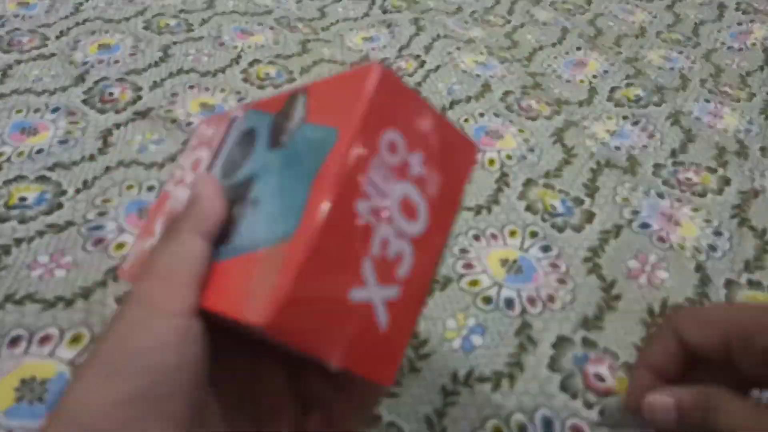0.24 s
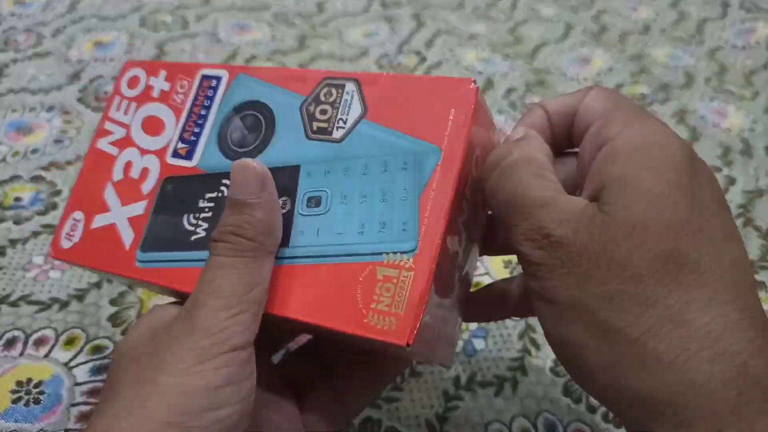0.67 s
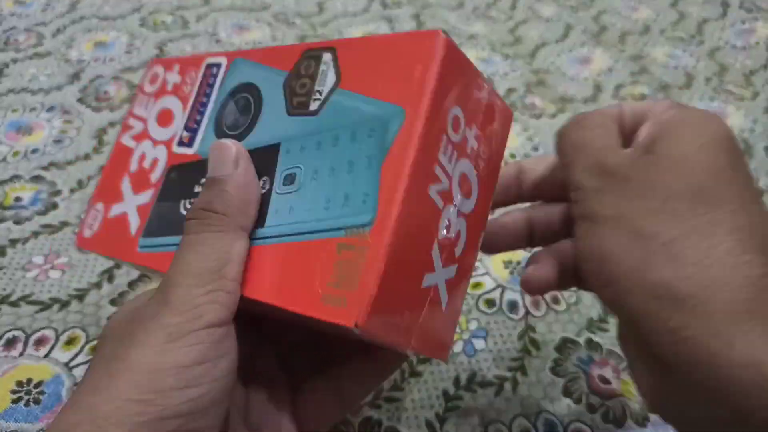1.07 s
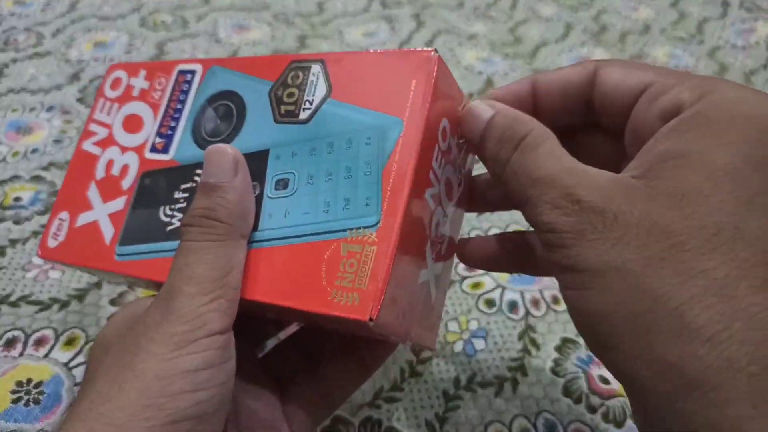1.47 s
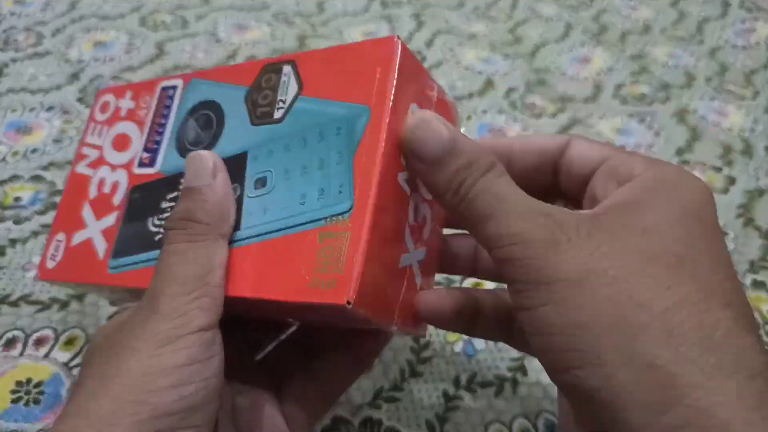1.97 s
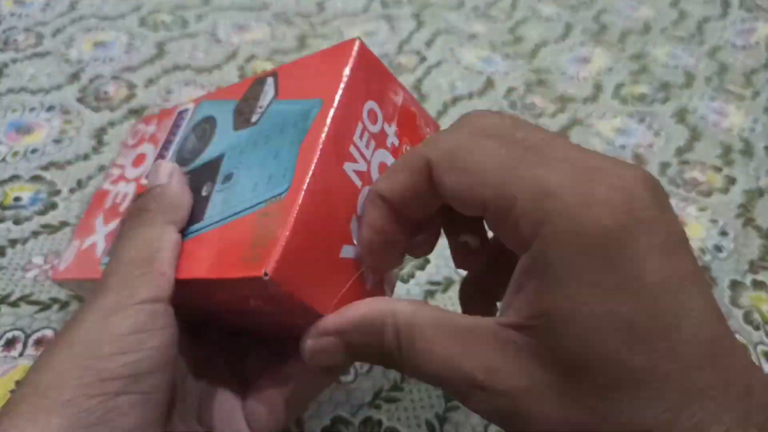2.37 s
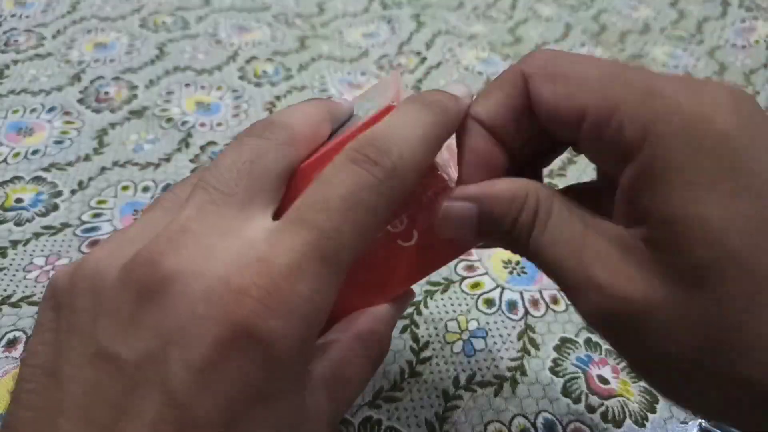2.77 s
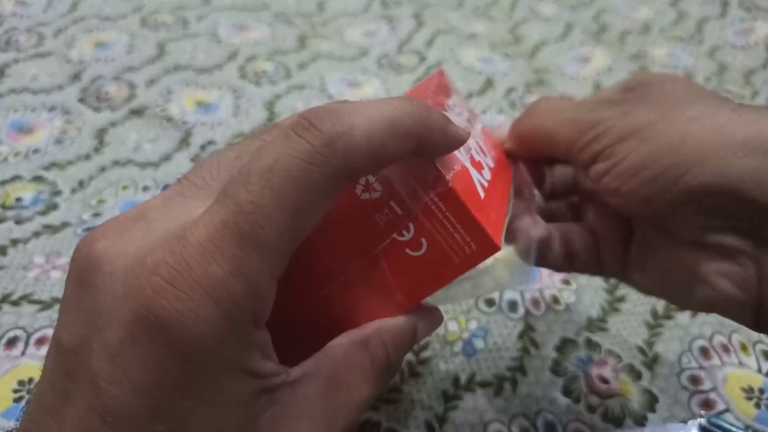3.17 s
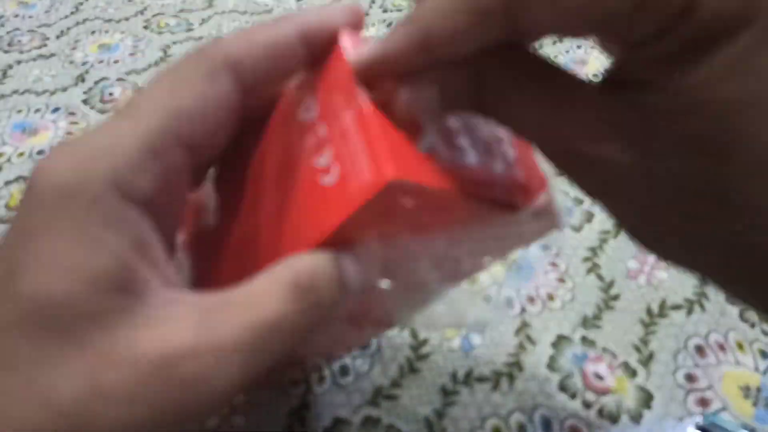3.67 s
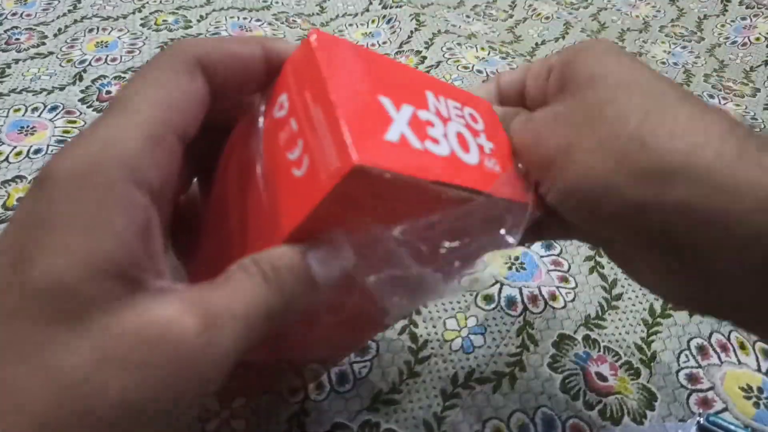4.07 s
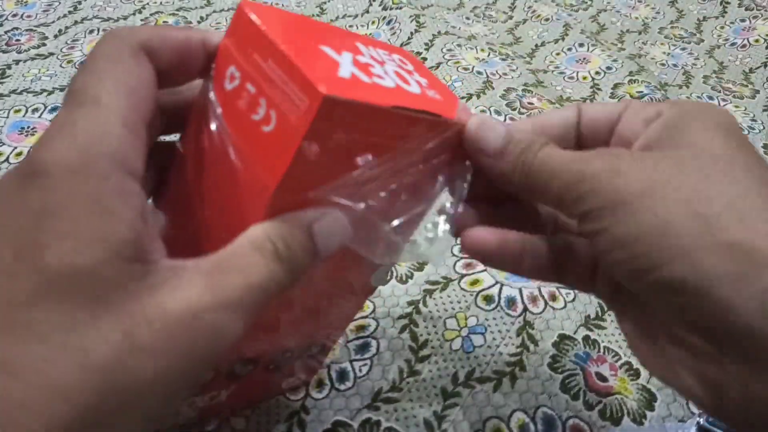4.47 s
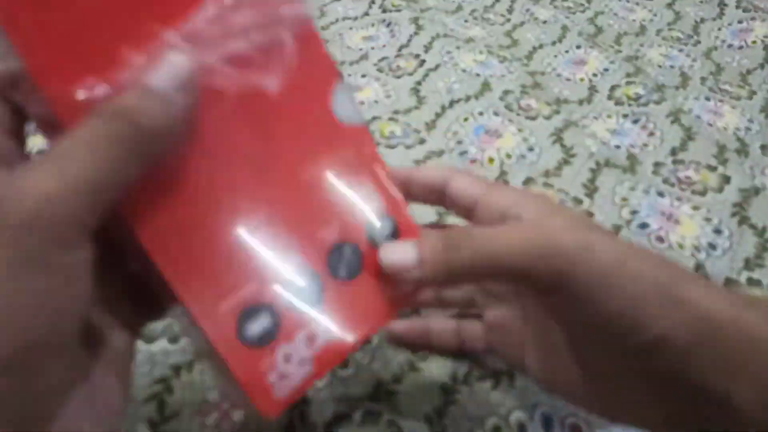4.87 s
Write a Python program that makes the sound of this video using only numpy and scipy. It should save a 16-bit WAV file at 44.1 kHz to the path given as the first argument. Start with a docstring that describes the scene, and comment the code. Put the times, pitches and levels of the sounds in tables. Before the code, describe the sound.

Fingers pick and peel thin plastic wrap from a small cardboard box, very close to a phone microphone. A few sharp snaps come early, then sparse ticks, then busy crackling with loud snaps and hollow thuds through the middle, brief film slides, lighter crinkling, and a final crisp burst. Small furnished room with short echoes, faint low traffic and hiss.

```python
"""Peeling film off a small box

Fingers pick at, tear and peel thin plastic film around a cardboard box held close to a phone.
Creases snap as gritty bursts that ring box, card and film; tiny puffs of noise crackle in between.
The film slides with a banded hiss, the hollow box gives low thuds, and skin brushes as filtered noise.
A furnished room answers with short echoes, over filtered noise for far traffic, palms and a faint hiss."""
import sys
import numpy as np
from scipy import signal
from scipy.fft import rfft, irfft
from scipy.io import wavfile
from scipy.ndimage import uniform_filter1d

SR = 44100
rng = np.random.default_rng(int(sys.argv[2]) if len(sys.argv) > 2 else 0)


def unload_audio(sound):
    """Save the sound as a 16-bit wav file, at the path given as the first command line argument."""
    columns = np.transpose(np.atleast_2d(sound))
    # keep every value between -1 and 1, then stretch to whole-number steps
    steps = np.round(np.clip(columns, -1, 1) * 32767)
    wavfile.write(sys.argv[1], SR, steps.astype(np.int16))


N = 225792  # length of the scene in samples

# Creases snapping; levels are before the trim of each part:
# start_s [s], knock_db, crack_db, ring_db, sizzle_db [dB], knock_pitch_hz [Hz], length_ms [ms]
CREASE_SNAPS = [(.1062, -58, -50.5, -46, -61, 1060, 5.6), (.1235, -60, -48, -43, -54, 980, 7.2),
                (.1308, -53, -51, -62, -69, 990, 2.7), (.1412, -37, -23.5, -23.5, -30, 1240, 2),
                (.1513, -34, -23.5, -15.5, -55, 1450, 1.4), (.1626, -49.5, -34.5, -32.5, -63, 870, 13),
                (.2772, -54, -62, -73, -77, 1080, 3.8), (.316, -62, -63, -61, -74, 1500, 1.2),
                (.3972, -43, -41.5, -47, -64, 800, 0.23), (.423, -55.5, -53, -49, -54, 1200, 1.1),
                (.467, -72, -67, -62, -70, 1000, 1.2), (.4937, -71, -67, -58, -72, 910, 1.6),
                (.5096, -74, -67, -53, -72, 940, 1.9), (.525, -64, -58, -47.5, -57, 950, 0.49),
                (.544, -48, -52.5, -53, -67, 985, 1.1), (.677, -66, -59, -55.5, -64, 1100, 6.4),
                (.7124, -28.5, -17.5, -19, -53, 1850, 1.12), (.813, -49.5, -49, -53.5, -72.5, 1230, 0.81),
                (1.0273, -45.5, -38.5, -35, -57, 860, 0.8), (1.0605, -54, -48.5, -44.5, -52.5, 1170, 9.2),
                (1.0734, -62.5, -46, -49.5, -60, 1300, 17), (1.603, -55.5, -63, -59.5, -79.5, 1405, 1.1),
                (1.7395, -54, -61, -47, -37.5, 1400, 2.9), (1.8297, -63, -44.5, -40, -55, 1210, 0.67),
                (1.8364, -64, -66, -47, -59, 930, 0.89), (1.8528, -66, -51.5, -53, -58, 930, 2.1),
                (1.9003, -46, -42, -41.5, -55, 880, 1.2), (1.907, -54.5, -49, -43, -56.5, 1720, 20),
                (1.925, -47.5, -45, -49, -63, 900, 0.45), (1.9407, -57, -64, -59, -78, 1300, 1.6),
                (1.9954, -48, -47.5, -51.5, -57, 990, 3.7), (2.0669, -39, -37.5, -51, -64, 1710, .89),
                (2.08, -56, -68, -68, -78, 900, 1.8), (2.0939, -54, -72, -67, -77, 1500, .54),
                (2.1063, -58, -55.5, -57, -70, 1670, 2.7), (2.125, -66, -54, -56, -71, 860, 2.2),
                (2.137, -60, -48, -59, -64, 1020, 0.93), (2.1425, -58, -57, -49, -50, 1020, 5.5),
                (2.1484, -30, -22, -23.5, -30, 1340, 1), (2.157, -54, -59, -66, -46, 1040, 2.4),
                (2.1865, -52, -68, -67, -71, 1200, 2.1), (2.2078, -42.5, -49, -48.5, -66, 1060, 0.3),
                (2.2546, -57, -65, -49.5, -63, 1050, 0.48), (2.2925, -46, -60, -66, -80, 1190, 1.6),
                (2.3413, -55.5, -55, -49, -54, 1130, 3), (2.4148, -34, -34, -12, -30, 1610, 1.2),
                (2.4192, -50.5, -44, -36, -55, 1000, .8), (2.4247, -18, -20, -18, -60, 905, 1.16),
                (2.4347, -39, -33, -42, -49, 965, 10.5), (2.4572, -45, -71, -50, -72, 860, 11),
                (2.4818, -40, -45.5, -49, -59, 1190, 3.4), (2.512, -60, -46, -42, -63, 900, 1),
                (2.519, -34.5, -48, -27, -38, 884, 1.36), (2.5828, -43, -41, -42, -50, 1050, 1.26),
                (2.649, -62, -53.5, -51, -61, 1170, 2), (2.7149, -51.5, -38, -69, -49.5, 1230, .57),
                (2.768, -61, -53, -51, -72, 1590, 1.4), (2.7801, -36, -24.5, -33, -34, 970, 0.65),
                (2.785, -55, -58, -58, -61, 1050, 2.4), (2.8075, -57, -48, -32, -33, 955, 0.56),
                (2.8161, -41, -25.5, -25.5, -36.5, 1860, 3.1), (2.8334, -40, -39.5, -40, -48, 900, 7.5),
                (2.8558, -51, -70, -49, -61, 940, 3.1), (2.905, -53.5, -45, -45.5, -57, 990, 5.1),
                (2.931, -47.5, -48, -56, -69, 1060, 1.9), (2.9496, -42, -61, -47.5, -67, 1110, 1.5),
                (2.9571, -53, -59, -64, -72, 1150, 1.1), (2.9826, -56, -50, -49.5, -68, 1150, 1.5),
                (3.001, -71, -60, -56, -70, 1370, 1.8), (3.015, -44.5, -66, -52, -72, 1180, 2.8),
                (3.0327, -63, -68, -53, -67, 940, .95), (3.0503, -44, -38.5, -45, -49, 1190, 1.1),
                (3.0624, -70, -51, -47, -50, 950, 0.54), (3.092, -54, -48.5, -56, -65, 1160, 1.8),
                (3.115, -73, -49.5, -47, -51, 940, 6.4), (3.1266, -52, -44.5, -43.5, -53, 830, 1.6),
                (3.133, -56, -47, -42.5, -50, 840, 0.91), (3.1858, -56, -50.5, -49, -59, 1300, 1.1),
                (3.2138, -55, -46.5, -61, -54, 1050, 0.8), (3.219, -49.5, -49, -49, -60, 890, 3.1),
                (3.2688, -86, -55, -48.5, -55, 970, 2.3), (3.3207, -74, -48.5, -51, -69, 1470, 0.29),
                (3.3873, -38.5, -42.5, -47, -55, 1200, 2), (3.426, -46, -49, -69, -73, 1630, 0.57),
                (3.4301, -47, -38, -37.5, -52.5, 1150, 1.4), (3.4784, -48, -43, -41, -58, 1500, 1.05),
                (3.505, -57, -53, -53, -58, 1160, 7.1), (3.5332, -52, -37, -38.5, -51, 760, 0.53),
                (3.5401, -42.5, -38, -40, -46.5, 1280, 5.9), (3.5647, -41, -50.5, -54, -71, 870, 4.5),
                (3.6, -53, -40, -41.5, -57, 1430, 2.3), (3.638, -53.5, -55.5, -53, -56, 930, 1.8),
                (3.7427, -54.5, -50.5, -40.5, -41.5, 1110, 4.3), (3.795, -50, -41, -35, -73, 845, 0.24),
                (3.8033, -50, -56, -43, -48, 1120, 1.1), (3.81, -47.5, -50, -51, -54, 1020, 2.1),
                (3.8401, -44.5, -33, -69, -53, 1470, 1.9), (3.8511, -40, -34.5, -37, -46, 900, 3.2),
                (3.9332, -51, -54, -66, -72, 934, 6.2), (3.943, -58, -47, -58, -76, 1000, 1.4),
                (3.9874, -57, -52, -47.5, -59, 1360, 1.3), (4.0081, -67, -44, -52, -55, 1540, 0.55),
                (4.0123, -46, -46, -52, -61, 1360, 1.7), (4.021, -75, -48.5, -50, -61, 1590, 19),
                (4.0575, -82, -45, -42.5, -46, 1520, 10), (4.0827, -39, -47, -46, -68, 2040, 1.6),
                (4.1155, -55, -42, -35, -79, 1450, 0.42), (4.12, -49.5, -47.5, -46, -62, 1200, 3.8),
                (4.1581, -41, -50, -51, -60, 1830, 2.2), (4.1708, -50, -60, -62, -67, 1450, 3.9),
                (4.212, -54.5, -64, -63, -72, 1240, 1.6), (4.229, -53, -52, -68, -73, 1030, 3.2),
                (4.2407, -57, -54, -49.5, -69, 1070, 3.3), (4.2675, -49.5, -44.5, -59, -67, 1340, 2.3),
                (4.3133, -60, -55.5, -62, -73, 1120, 2.4), (4.341, -68, -60, -54.5, -62, 1230, 2.8),
                (4.3834, -60, -61, -58, -74, 780, 4.1), (4.411, -71, -57, -56, -65, 1000, 1.5),
                (4.4326, -58, -51, -50.5, -60.5, 1630, 3.3), (4.4476, -49, -57, -59, -77, 930, 1.4),
                (4.4991, -50, -61, -60, -73, 1024, 2.2), (4.6315, -58, -55, -55, -72, 1140, 5.2),
                (4.66, -66, -58.5, -62, -72, 1200, 0.98), (4.6708, -73, -55.5, -62, -79, 1570, 0.9),
                (4.6777, -60, -57, -60, -74, 820, 1.3), (4.6895, -57.5, -50, -51.5, -61, 1210, 8.9),
                (4.7722, -29.5, -25.5, -24, -34, 1400, 1.65), (4.7838, -40, -43, -52, -49, 880, 1.4),
                (4.7968, -66, -59, -52, -50, 1250, .9), (4.8108, -44.5, -40, -39, -53, 1210, 1.1),
                (4.8208, -50, -50, -57, -61, 1130, 3.6), (4.8417, -56, -52, -51, -61, 1050, 1.5),
                (4.8617, -38.5, -74, -59, -74, 940, 2.1), (4.9177, -48.5, -71, -56, -77, 810, 1.5),
                (4.9625, -63, -63, -54.5, -75, 1160, 2.7), (4.996, -51, -44, -49, -52, 980, 1.9),
                (5.034, -65, -52.5, -48, -65, 930, 5.6), (5.051, -77, -50, -50, -64, 810, 7.2),
                (5.1159, -34.5, -28, -25, -28, 1150, 0.29)]
# What a snap sets going, rows box thud, card knock, film crack, film ring, film sizzle:
# pitch_hz [Hz], nominal width_hz [Hz], trim_db [dB, for snaps only]
SOUNDING_PARTS = [(328, 220, 2), (1020, 984, 5), (3904, 1950, 4.5), (6735, 1050, 1), (14000, 2800, 4)]
# How hard the break hits each of the five parts, compared with the grit of the slip: push_db [dB]
BREAK_PUSH_DB = [14.3, 16.2, 6.5, 4, 3]
# Sign of the push for each part, so that thud and knock add where their bands overlap: sign [+1 or -1]
BREAK_PUSH_SIGN = [-1, 1, 1, 1, 1]
# Snaps ring more narrowly than crackle: share of each part's width [ratio]
SNAP_WIDTH_SHARE = [1, 0.64, 0.82, 0.97, 1]
THUD_DB = -7  # the box thud compared with the knock on its card
CRACK_OCT_PER_DB = 0.09  # the more a crease rings, the higher it cracks


def snaps(table, build=0.36, fade=0.98, grit_db=-1.0, lead_ms=6):
    """A gritty slip builds up fast, breaks and lets go; the same slip drives box, card and film."""
    out = np.zeros(N)
    ms = np.arange(1024) * 1000 / SR - lead_ms  # zero is the moment of breaking
    chance = rng.standard_normal((len(table), 2, len(ms)))
    box, card, film_crack, film_ring, film_sizzle = SOUNDING_PARTS
    pushes = BREAK_PUSH_SIGN * undb(BREAK_PUSH_DB)
    for row, (noise, grit) in zip(table, chance):
        start_s, knock_db, crack_db, ring_db, sizzle_db, knock_hz, length_ms = row
        u = ms / max(length_ms, .3)  # time in snap lengths
        envelope = np.exp(np.where(u < 0, u / build, -u / fade))
        slip = envelope * noise * undb(grit_db * grit)
        click = np.arange(len(u)) == np.argmax(u >= 0)  # one sample at the break
        octaves = np.clip(CRACK_OCT_PER_DB * (ring_db - crack_db), -.4, .4)
        pitches = [box[0], knock_hz, film_crack[0] * 2 ** octaves, film_ring[0], film_sizzle[0]]
        levels = [knock_db + THUD_DB, knock_db, crack_db, ring_db, sizzle_db]
        parts = zip(pitches, SOUNDING_PARTS, levels, pushes, SNAP_WIDTH_SHARE)
        for hz, (_, width_hz, trim_db), level_db, push, share in parts:
            sound = ring(slip + push * click, hz, share * width_hz)
            # The level is that of the loudest 64 samples.
            peak = np.sqrt(uniform_filter1d(sound ** 2, size=64).max())
            add(out, max(start_s - lead_ms / 1000, 0), sound * undb(level_db + trim_db) / peak)
    return out


# How busily the fingers work the film, joined by straight lines:
# start_s [s], level_db [dB], colour_db [dB, raises mostly the ring and the knock]
FINGER_WORK = [(0, -75.5, -5), (.16, -59.5, -4), (.33, -69, -2), (.48, -64, -2), (.6, -77.5, 3.5),
               (1.3, -73.5, -4), (1.7, -73, 0), (1.87, -67, -5), (2.01, -65, -7), (2.48, -61, 2),
               (2.76, -70.5, -10), (2.95, -60.5, -11), (3.26, -66.5, 4), (3.45, -71, -18),
               (3.65, -62.5, -2.5), (3.95, -68, 1.5), (4.06, -62, 1), (4.24, -70, -5), (4.62, -74.5, 0),
               (4.82, -57, 0.5), (4.99, -65.5, -7), (5.12, -49, -4)]
# Balance of knock, crack, ring and sizzle against that level: band_db [dB]
CRACKLE_BALANCE_DB = [-3, -1, -0.5, -7.5]
CRACKLE_PER_S, CRACKLE_SPREAD_DB, CRACKLE_MS = 1700, 4.5, 2  # average rate, unevenness, fade time


def crackle():
    """Countless tiny creases of very uneven size each give a short puff of noise."""
    happens = rng.random(N) < CRACKLE_PER_S / SR
    ticks = happens * undb(CRACKLE_SPREAD_DB * rng.exponential(size=N))
    fade = np.exp(-1000 / (CRACKLE_MS * SR))
    grains = signal.lfilter([1], [1, -fade], ticks) * rng.standard_normal(N)
    level_db, colour_db = curves(FINGER_WORK)
    colour_shares = [0.64, 0, 0.82, 0.076]  # how much each band follows the colour
    out = np.zeros(N)
    for band_db, share, (hz, width_hz, _) in zip(CRACKLE_BALANCE_DB, colour_shares, SOUNDING_PARTS[1:]):
        out += undb(level_db + band_db + share * colour_db) * unit(ring(grains, hz, width_hz))
    return out


STRAY_PER_S, STRAY_MS = 9, 3.3  # rate; middle length, which varies
STRAY_DB, STRAY_COLOUR_DB = 4.5, 5  # above the crackle level; scatter of each part


def strays():
    """Rows of lesser snaps at random times, stronger when fingers are busy, each with its own colour."""
    count = int(STRAY_PER_S * N / SR)
    where = rng.random(count)  # share of the scene's length
    chance = rng.standard_normal((count, 6))
    level_db = curves(FINGER_WORK)[0][(where * N).astype(int)] + STRAY_DB
    parts_db = level_db[:, None] + CRACKLE_BALANCE_DB + STRAY_COLOUR_DB * chance[:, :4]
    knock_hz = SOUNDING_PARTS[1][0] * 1.2 ** chance[:, 4]
    length_ms = STRAY_MS * 2.4 ** chance[:, 5]
    return np.column_stack([where * N / SR, parts_db, knock_hz, length_ms])


# Film pulled over the card, one row a pull:
# start_s [s], end_s [s], level_db [dB, before the band balance], pitch_hz [Hz, lowest band, unbent]
FILM_PULLS = [(3.64, 3.726, -62, 2825), (3.735, 3.84, -63, 2730), (3.86, 4.016, -64, 2764)]
# Bands of the hiss: multiple [times the lowest pitch], width_hz [Hz], band_db [dB]
HISS_BANDS = [(1, 250, 1), (1.45, 630, 2), (2, 500, -14), (1.8, 1300, 1)]
SLIDE_EDGE_S = 0.024  # grip and release
SLIDE_BEND, SLIDE_WAVER = .02, 0.026  # shares of the pitch: rise at mid pull, random wander


def slide():
    """Friction hisses in a few narrow bands that drift together as the tension changes."""
    t, gain, hz = np.arange(N) / SR, np.zeros(N), np.zeros(N)
    waver = SLIDE_WAVER * unit(signal.lfilter(*signal.butter(2, 25, fs=SR), rng.standard_normal(N)))
    for start_s, end_s, level_db, pitch_hz in FILM_PULLS:
        on = (t > start_s) & (t < end_s)
        gain += undb(level_db) * np.clip(np.minimum(t - start_s, end_s - t) / SLIDE_EDGE_S, 0, 1)
        bend = SLIDE_BEND * np.sin(np.pi * (t - start_s) / (end_s - start_s))
        hz += on * pitch_hz * (1 + waver + bend)
    phase = 2 * np.pi * np.cumsum(hz) / SR
    out = np.zeros(N)
    for multiple, width_hz, band_db in HISS_BANDS:
        # Slow noise on a cosine and a sine makes a noise band around the moving pitch.
        slow = signal.lfilter(*signal.butter(2, width_hz / 2, fs=SR), rng.standard_normal((2, N)))
        band = slow[0] * np.cos(multiple * phase) + slow[1] * np.sin(multiple * phase)
        out += undb(band_db) * unit(band)
    return out * gain


# Low thuds of the hollow box, from finger pats or under a snap:
# start_s [s], level_db [dB, before onset and decay], pitch_hz [Hz]
BOX_THUDS = [(.255, -35.5, 278), (1.188, -39.5, 173), (1.901, -29.5, 260), (1.926, -42, 252),
             (2.033, -36, 165), (2.047, -31.5, 146), (2.057, -34.5, 172), (2.081, -37, 147),
             (2.122, -39, 250), (2.165, -35, 196), (2.187, -38, 320), (2.291, -34.5, 315),
             (2.4805, -27.5, 353), (2.5823, -29, 330), (2.688, -38, 300), (2.781, -30, 333),
             (2.834, -29, 306), (2.95, -29.5, 353), (3.0137, -34, 315), (3.3974, -46, 342),
             (3.428, -52, 348), (3.535, -23, 261), (3.54, -25.5, 387), (3.55, -35, 202), (3.557, -27, 245),
             (3.556, -45, 59.7), (3.5649, -23, 195), (3.651, -36.5, 200), (3.838, -29.5, 216),
             (3.85, -52, 216), (3.852, -30.5, 397), (3.82, -33, 325), (4.383, -43, 316),
             (4.432, -40.5, 330), (4.499, -36.5, 330), (4.826, -37, 330), (4.841, -39.5, 147),
             (4.862, -32.5, 360), (4.918, -37.5, 340), (5.092, -36, 254)]


def box_thuds(ring_cycles=0.79):
    """The hollow box rings low for a cycle or two, with a soft onset and a fast decay."""
    out, t = np.zeros(N), np.arange(2048) / SR
    for start_s, level_db, hz in BOX_THUDS:
        envelope = np.tanh(4 * hz * t) * np.exp(-hz * t / ring_cycles)
        add(out, start_s, undb(level_db) * np.sin(2 * np.pi * hz * t) * envelope)
    return out


# Skin brushing the film: start_s [s], level_db [dB, before the swell], pitch_hz [Hz], length_ms [ms]
SKIN_BRUSHES = [(.156, -49, 4100, 56), (.25, -60, 1000, 57), (.272, -53, 1230, 13), (.29, -50, 890, 4.2),
                (.33, -55, 3500, 6.7), (.365, -59, 6950, 29), (.374, -60, 1500, 18), (.433, -56, 1970, 5.4),
                (.45, -59, 694, 28), (1.212, -60.5, 6900, 14), (1.215, -61, 3920, 14),
                (1.307, -59, 4200, 17), (1.349, -63, 3820, 35), (1.429, -59.5, 6300, 20),
                (1.856, -53.5, 610, 11), (2.233, -50, 880, 11), (2.26, -59.5, 460, 71),
                (2.303, -58, 1050, 21), (2.67, -51.5, 513, 36), (4.082, -51, 1920, 16),
                (4.114, -68, 1180, 13), (4.149, -61, 1930, 73)]
BRUSH_WIDTH = 0.32  # share of the pitch


def brushes():
    """Skin rubbing the film gives a short swell of noise around one pitch."""
    out = np.zeros(N)
    noises = rng.standard_normal((len(SKIN_BRUSHES), 4096))
    for (start_s, level_db, hz, length_ms), noise in zip(SKIN_BRUSHES, noises):
        ms = np.arange(len(noise)) * 1000 / SR
        swell = np.sin(np.pi * np.clip(ms / length_ms, 0, 1))
        add(out, start_s, undb(level_db) * swell * unit(ring(noise, hz, BRUSH_WIDTH * hz)))
    return out


ROOM_T60_S, ROOM_DB = 0.073, -18.5  # time to die by 60 dB; total strength of the echoes
ROOM_GAP_MS, ROOM_DULL_HZ = 4.3, 6980  # build-up time; treble falls off above this


def room(x):
    """Diffuse echoes build up after a short gap and die fast; cloth returns little bass and a dull top."""
    s = np.arange(int(.4 * SR)) / SR
    build_up = 1 - np.exp(-(1000 * s / ROOM_GAP_MS) ** 2)
    tail = rng.standard_normal(len(s)) * build_up * undb(-60 * s / ROOM_T60_S)
    less_bass = signal.lfilter([1, -.8], 1, tail)
    tail = signal.lfilter(*signal.butter(2, ROOM_DULL_HZ, fs=SR), less_bass)
    return signal.fftconvolve(x, undb(ROOM_DB) * tail / np.sqrt(np.sum(tail ** 2)))[:N]


RUB_HZ, RUB_WIDTH_HZ = 287, 266  # pitch and nominal width
RUB_DB, RUB_FOLLOW = -64.5, 0.24  # middle level; share of the fingers' level changes it follows


def palms():
    """Palms rub the box as a low band of noise, partly following how busy the fingers are."""
    busy_db = curves(FINGER_WORK)[0]
    level_db = RUB_DB + RUB_FOLLOW * (busy_db - busy_db.mean())
    return undb(level_db) * unit(ring(rng.standard_normal(N), RUB_HZ, RUB_WIDTH_HZ))


# Far traffic rising and sinking: start_s [s], drone_db [dB], deep_db [dB]
TRAFFIC_LEVELS = [(0, -47.5, -57.5), (.6, -54.5, -59), (1.24, -51.5, -57), (1.5, -51.5, -70),
                  (1.75, -58, -74), (2, -56, -61), (2.25, -48, -58), (2.5, -66, -71), (2.8, -65, -98),
                  (3, -68, -73), (3.35, -67, -70), (3.8, -63, -70), (4.3, -61, -77), (5.12, -60.5, -70)]
# Rows drone and deep rumble: pitch_hz [Hz], nominal width_hz [Hz]
RUMBLE_BANDS = [(110.6, 45), (37.3, 59)]


def traffic():
    """Traffic heard through the walls is two low bands of noise with changing levels."""
    out = np.zeros(N)
    for level_db, (hz, width_hz) in zip(curves(TRAFFIC_LEVELS), RUMBLE_BANDS):
        out += undb(level_db) * unit(ring(rng.standard_normal(N), hz, width_hz))
    return out


# Colour of the steady hiss: pitch_hz [Hz], level_db [dB, relative]
HISS_COLOUR = [(180, -33.5), (300, -11), (2820, -12.5), (3960, -11), (5180, -17), (6670, -17.5),
               (9040, -44.5), (11100, -25.5), (15000, -17), (16000, -28), (16900, -55)]
AIR_DB = -68  # overall level


def air():
    """A steady faint hiss is noise shaped across the pitch range."""
    return undb(AIR_DB) * unit(colour(rng.standard_normal(N), HISS_COLOUR))


def undb(db):
    """Turn decibels into a plain factor."""
    return 10 ** (np.asarray(db) / 20)


def unit(x):
    """Scale to rms 1."""
    return x / np.sqrt(np.mean(x ** 2))


def ring(x, hz, width_hz):
    """A steep resonance: a two-pole band-pass applied twice."""
    b, a = signal.iirpeak(hz, hz / (2.12 * width_hz), fs=SR)
    return signal.lfilter(b, a, signal.lfilter(b, a, x))


def colour(x, points):
    """Filter with the gain of (Hz, dB) points, without ringing ahead of the sound."""
    hz, db = np.transpose(points)
    grid_hz = np.arange(513) * SR / 1024
    log_gain = np.interp(np.log(grid_hz + 1), np.log(hz), db) * np.log(10) / 20
    # Folding the cepstrum (the transform of the log gain) forward makes the filter causal.
    cepstrum = irfft(log_gain)
    cepstrum[1:512] *= 2
    cepstrum[513:] = 0
    return signal.lfilter(irfft(np.exp(rfft(cepstrum))), 1, x)


def curves(table):
    """Each column after the time as a value per sample."""
    s, *columns = np.transpose(table)
    return [np.interp(np.arange(N) / SR, s, column) for column in columns]


def add(out, s, wave):
    """Mix a short sound in at time s."""
    i = int(s * SR)
    out[i:i + len(wave)] += wave[:N - i]


def scene():
    """Hands and film close by, their echoes, the background."""
    near = snaps(CREASE_SNAPS) + snaps(strays()) + crackle() + slide() + box_thuds() + brushes()
    background = palms() + traffic() + air()
    return (near + room(near) + background)[None]


# How the phone hears each pitch: pitch_hz [Hz], gain_db [dB]
PHONE_RESPONSE = [(100, 0.5), (5000, -6.5), (5400, -9.5), (6200, 0.5), (8000, -9.5), (8800, -22),
                  (11200, -23), (11800, -4), (15500, -4.5)]
SELF_NOISE_DB, TOP_HZ = -88.5, 15900  # circuit hiss before the top is cut; edge of that cut


def record(dry):
    """The phone's port has a deep dip near 10 kHz; its circuit hisses faintly; the top is cut."""
    heard = colour(dry, PHONE_RESPONSE) + undb(SELF_NOISE_DB) * rng.standard_normal(dry.shape)
    return signal.sosfilt(signal.ellip(10, .2, 70, TOP_HZ, fs=SR, output="sos"), heard)


dry = scene()
out = record(dry)
unload_audio(out)
```